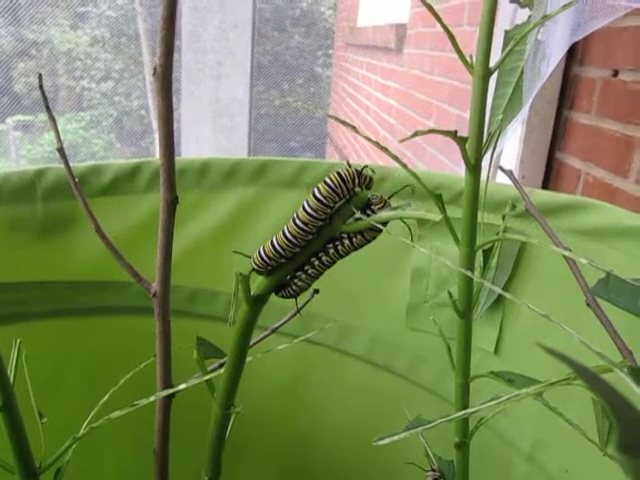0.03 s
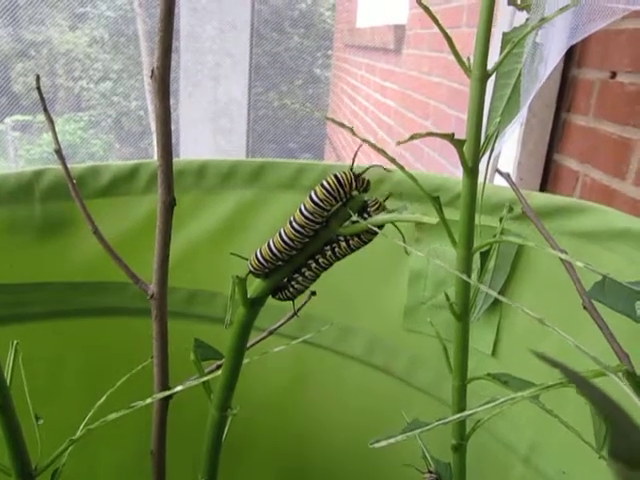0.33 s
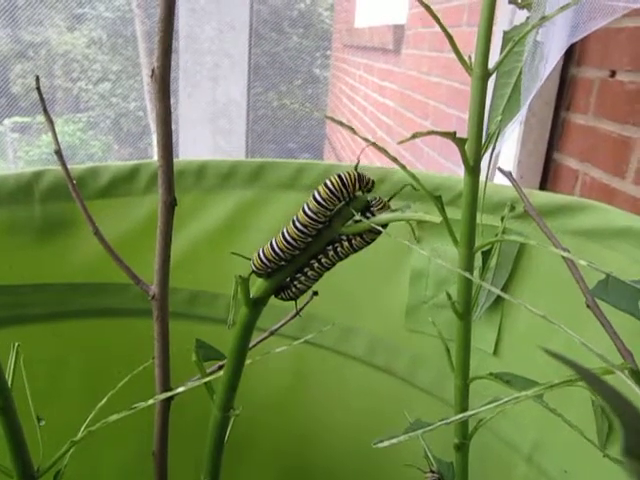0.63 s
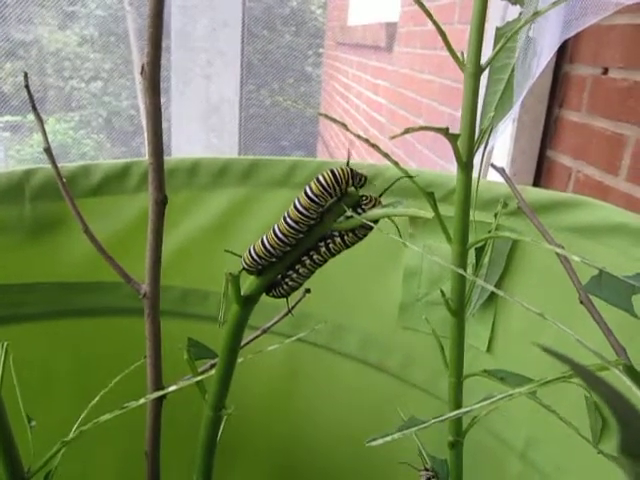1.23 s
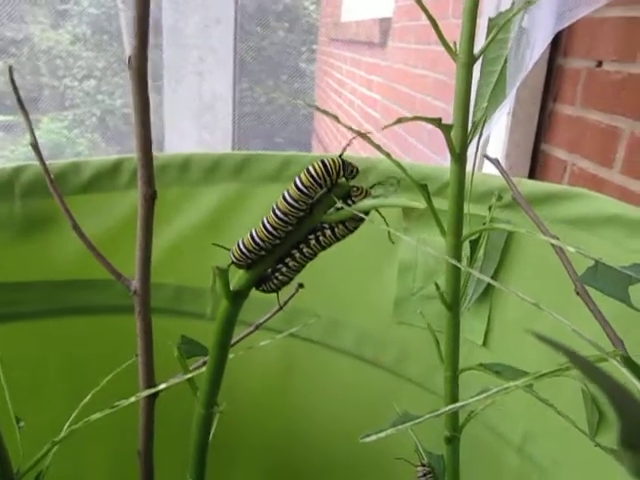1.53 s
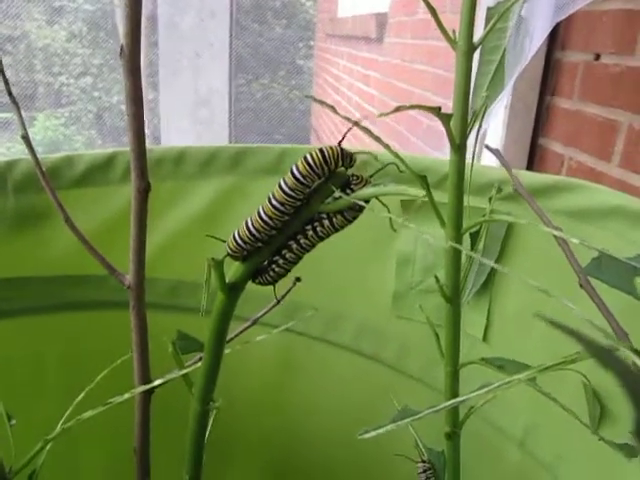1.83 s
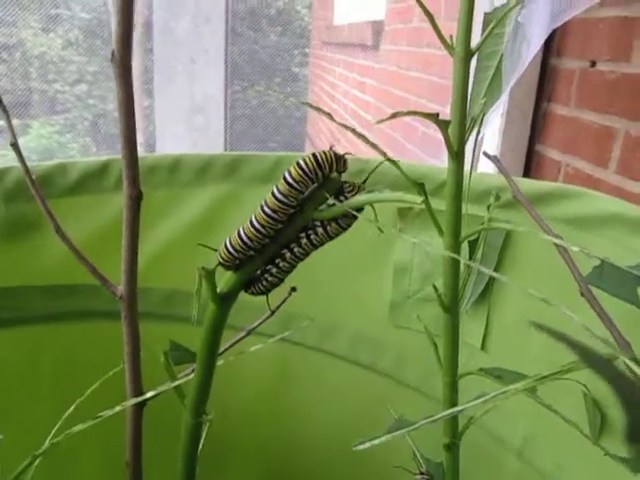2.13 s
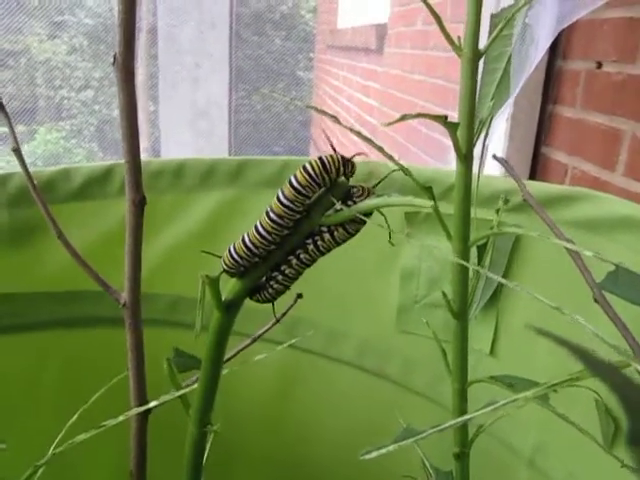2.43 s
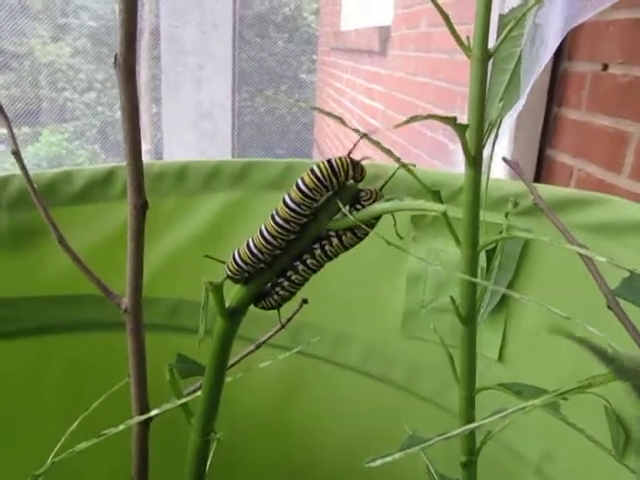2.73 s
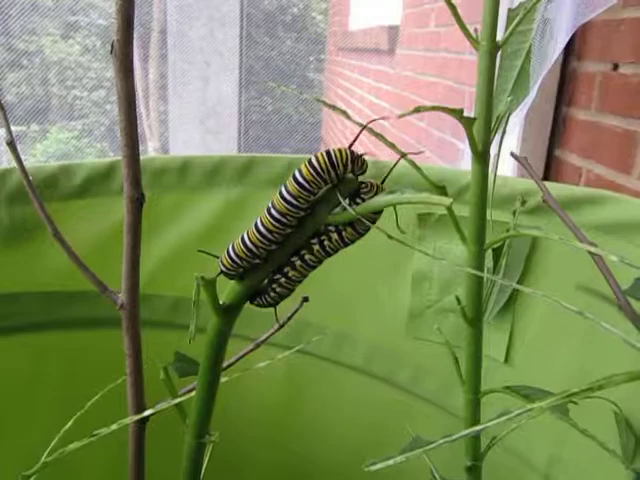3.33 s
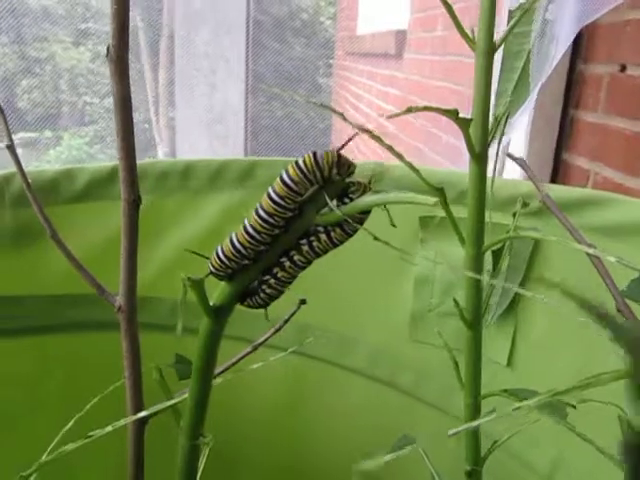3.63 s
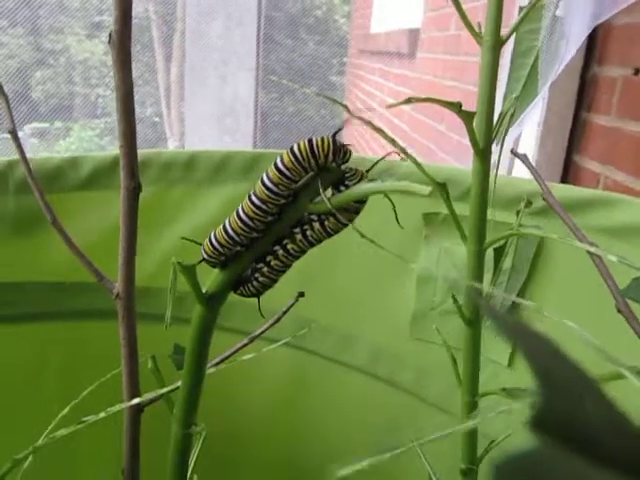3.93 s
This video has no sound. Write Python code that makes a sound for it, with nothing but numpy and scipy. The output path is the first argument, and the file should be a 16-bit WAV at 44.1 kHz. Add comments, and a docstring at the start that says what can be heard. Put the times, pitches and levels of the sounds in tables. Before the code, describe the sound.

Insects drone in a steady, high chorus in a garden, over a low rumble and airy hush. Distant birds chirp faintly now and then. Soft handling knocks and rustles come close to the microphone, with one sharp click late on.

```python
"""Far insect chorus in a summer garden: many calls merge into a pulsing noise band near 6 kHz.
A few nearer insects hold narrow pitches; a low rumble and an airy hush lie underneath.
One distant bird chips in pairs, another gives falling whistles; both echo among the trees.
Close by: one sharp ringing click, and noise bursts for soft knocks, scuffs and rustles of handling."""
import sys
import numpy as np
from scipy import signal
from scipy.fft import rfft, irfft, next_fast_len
from scipy.io import wavfile
from scipy.ndimage import uniform_filter1d, map_coordinates

SR = 44100
rng = np.random.default_rng(int(sys.argv[2]) if len(sys.argv) > 2 else 0)


def unload_audio(sound):
    """Save the sound as a 16-bit wav file, at the path given as the first command line argument."""
    columns = np.transpose(np.atleast_2d(sound))
    # keep every value between -1 and 1, then stretch to whole-number steps
    steps = np.round(np.clip(columns, -1, 1) * 32767)
    wavfile.write(sys.argv[1], SR, steps.astype(np.int16))


N = 176400

# Noise spectra. Each row: frequency in Hz, relative density in dB.
RUMBLE_SPECTRUM = [(10, -34), (20, -9), (35, -3), (57, 1), (72, -2.5), (88, 1), (100, -3), (114, -0.34),
                   (140, -6), (170, -13), (240, -16), (400, -34.5), (800, -70)]
AIR_SPECTRUM = [(100, -11), (250, 1.5), (400, -1), (600, -3), (1120, -4.5), (1700, -9), (2700, -11),
                (4000, -16), (5200, -16), (7100, -20), (8000, -24.5), (10500, -27.5), (13000, -32.5),
                (15800, -37)]
FIZZ_SPECTRUM = [(2000, -15), (5000, -8), (8000, 3), (11000, -1), (15800, -13)]
CHORUS_SPECTRUM = [(4900, -36), (5400, -12.5), (5700, -5.5), (5950, -4.5), (6130, -0.5), (6280, -1),
                   (6400, -5.5), (6520, -12), (6700, -35)]
# Stereo width of the noises. Each row: frequency in Hz, side minus mid in dB.
STEREO_WIDTH = [(60, -26.5), (120, -21), (190, -17.5), (270, -18), (380, -13.5), (640, -12), (860, -7.5),
                (1250, -8), (1650, -5), (2500, -1.5), (4300, -1), (6000, -0.5), (7200, 1), (10000, 0.5),
                (15000, 0)]
# Swell of rumble and air. Each row: time in seconds, gain in dB.
BACKGROUND_SWELL = [(0, -1.5), (.25, -2), (.5, 0.5), (1.15, -0.8), (1.5, 0), (2.2, -0.3), (2.9, -0.34),
                    (4, .5)]
# Knocks and scuffs. Each row: start in seconds, level in dB, centre in Hz, width in octaves,
# T60 in seconds.
KNOCK_BURSTS = [(.445, -38, 1900, .1, .06), (.443, -41, 3900, .2, .03), (.598, -46, 4400, .2, .05),
                (1.995, -42, 2100, .3, 0.15), (2.095, -28, 740, .45, .024), (2.154, -35.5, 780, .4, .04),
                (2.275, -43, 2500, .5, .12), (2.519, -31.5, 1290, .8, .04), (2.555, -40.5, 4000, .5, .05),
                (2.6, -41.5, 5200, .25, 0.076), (3.195, -35.5, 2250, .28, .13),
                (3.222, -35.5, 1700, 0.8, .1), (3.345, -35.5, 900, 0.98, .05),
                (3.37, -37.5, 515, 0.83, 0.17), (3.383, -30.5, 900, 0.77, 0.037),
                (3.384, -36, 2700, .35, 0.044), (3.68, -29.5, 2700, 0.41, 0.035)]
# Fabric rustles. Each row: start in seconds, level in dB, centre in Hz, width in octaves,
# fade time in seconds.
RUSTLE_BURSTS = [(.4, -58, 14000, .3, .04), (0.473, -51.5, 10000, .4, 0.053), (.69, -54, 9000, .3, .04),
                 (.88, -57, 11000, .4, 0.04), (1.41, -46.5, 8800, 0.32, 0.036),
                 (1.45, -50.5, 9000, 0.45, 0.043), (1.68, -51.5, 9500, .45, 0.036),
                 (1.948, -44, 6800, .4, 0.04), (3.039, -47.5, 8600, 0.24, 0.035),
                 (3.222, -51, 8400, 0.34, 0.036), (3.775, -52.5, 10500, .35, 0.047)]
# Ringing modes of the click. Each row: frequency in Hz, relative level in dB, T60 in seconds.
CLICK_RING_MODES = [(549, -16.5, 0.052), (1084, -5, 0.028), (1610, -2.5, 0.0085), (2250, -10, 0.01),
                    (3280, -6, 0.0041), (4530, -5.5, 0.0073), (5200, -5, 0.0061), (9600, -13, 0.0028),
                    (13000, -16, .002)]
# Bird chips. Each row: start in seconds, pitch in Hz, level before echo in dB, left minus right in dB.
BIRD_CHIPS = [(.875, 3830, -42, -3), (.951, 3770, -42.5, -1), (1.62, 3720, -48, 0),
              (1.735, 3744, -46.5, -1), (2.824, 3795, -37, -3), (2.961, 3780, -40, -7),
              (3.583, 3780, -46.5, -2), (3.69, 3740, -43.5, 0)]
# Bird whistles. Each row: start and length in seconds, first and last pitch in Hz,
# level before echo in dB.
BIRD_WHISTLES = [(-.08, .19, 3150, 2960, -57), (2.05, 0.22, 3196, 2985, -57.5),
                 (3.71, 0.041, 3030, 2780, -52.5), (3.792, .025, 4500, 4270, -54)]
# Nearer insects. Each row: pitch in Hz, level in dB, left minus right in dB.
NEAR_INSECTS = [(5700, -63, 1), (5940, -61, -1), (6100, -59.5, 0), (6400, -61, 3)]
# Chorus loudness. Each row: time in seconds, base level in dB.
CHORUS_ENVELOPE = [(0, -50), (.25, -53), (.45, -48), (1.2, -49.5), (2, -49), (3, -50), (4, -49)]

RUMBLE_DB, RUMBLE_PAN_DB, AIR_DB, AIR_PAN_DB = -33.5, .83, -41.5, .4
FIZZ_DB, FIZZ_RATE_HZ, FIZZ_SWING_DB, FIZZ_GRAIN_DB = -66.5, 30, 3.5, 2.5
TICKS_PER_S, TICK_DB, TICK_SCATTER_DB = 14, -53.5, 2.5
TICK_HZ, TICK_OCTAVES, TICK_T60_S = 6500, .75, .055
HAND_PAN_DB, KNOCK_ATTACK_S, RUSTLE_ATTACK_S, RUSTLE_GRAIN_DB = 6, .001, .0063, 1.5
CLICK_START_S, CLICK_GAIN_DB, CLICK_PAN_DB, CLICK_RIGHT_LAG_S = 3.1138, -16.5, 10, .000292
CHIP_S, CHIP_FALL_HZ, CHIP_ECHO_DB, CHIP_JITTER_RAD = .015, 110, 1.5, .35
SLUR_S, SLUR_FALL_HZ, SLUR_GAIN_DB = .0298, 550, -11.5
TREES_T60_S, WHISTLE_ECHO_DB, WHISTLE_JITTER_RAD = .63, 8, .64
INSECT_HALF_WIDTH_HZ = 14
PULSE_HZ, PULSE_DEPTH, SURGE_HZ, SURGE_DB, CHORUS_PAN_DB = 84.8, .17, 3.2, .6, -1.6
TOP_HZ = 15800


def amp(db):
    """Decibels to gain."""
    return 10 ** (np.asarray(db) / 20)


def unit_rms(x):
    """Scale to rms 1."""
    return x / np.sqrt(np.mean(x ** 2) + 1e-20)


def pan(db):
    """Stereo gains for a left minus right level."""
    return amp(np.array([[db], [-db]]) / 2)


def gain_at(rows, hz):
    """Gain from (Hz, dB) rows, on a log frequency axis."""
    row_hz, row_db = np.transpose(rows)
    return amp(np.interp(np.log(hz + 1), np.log(row_hz + 1), row_db))


def curve(rows):
    """(s, value) rows interpolated per sample."""
    return np.interp(np.arange(N) / SR, *np.transpose(rows))


def wobble(rate_hz):
    """Smooth random curve, rate_hz knots a second."""
    knots = rng.standard_normal(int(N * rate_hz / SR) + 4)
    return map_coordinates(knots, [np.arange(N) * rate_hz / SR])


def filtered(x, response):
    """Apply a frequency response by FFT."""
    n = x.shape[-1]
    n_fft = next_fast_len(n + 8192)
    return irfft(rfft(x, n_fft) * response(np.fft.rfftfreq(n_fft, 1 / SR)), n_fft)[..., :n]


def add(out, start_s, x):
    """Mix in a stereo sound, cut at the edges."""
    i = round(start_s * SR)
    x = x[:, max(-i, 0):N - i]
    out[:, max(i, 0):max(i, 0) + x.shape[1]] += x


def diffuse(pair, response):
    """Colour two noises and blend them as mid and side, rms 1."""
    def mid_side_gains(hz):
        angle = np.arctan(gain_at(STEREO_WIDTH, hz))
        return response(hz) * np.array([np.cos(angle), np.sin(angle)])
    mid, side = filtered(pair, mid_side_gains)
    return unit_rms(np.array([mid + side, mid - side]))


def noise_bed(spectrum, patchy_db):
    """Stereo noise with random gain patches in time and frequency."""
    bins = signal.stft(rng.standard_normal((2, N)), nperseg=512)[2]
    patches = uniform_filter1d(rng.standard_normal(bins.shape[1:]), size=5, axis=0)
    patches = uniform_filter1d(patches, size=12, axis=1)
    pair = signal.istft(bins * amp(patchy_db * unit_rms(patches)), nperseg=512)[1][:, :N]
    return diffuse(pair, lambda hz: gain_at(spectrum, hz))


def noise_band(centre_hz, octaves):
    """Time axis and 0.25 s of stereo noise in one resonance."""
    def resonance(hz):
        detune = np.log2((hz + 1) / centre_hz) / octaves
        return 1 / (1 + detune ** 2 / 2) ** 2
    t = np.arange(SR // 4) / SR
    return t, diffuse(rng.standard_normal((2, len(t))), resonance)


def background():
    """Low rumble, as of far traffic, under an airy hush."""
    swell_db = curve(BACKGROUND_SWELL)
    rumble = amp(RUMBLE_DB + swell_db + .46 * wobble(5.03)) * noise_bed(RUMBLE_SPECTRUM, patchy_db=.3)
    air = amp(AIR_DB + swell_db + .3 * wobble(14)) * noise_bed(AIR_SPECTRUM, patchy_db=1.38)
    return pan(RUMBLE_PAN_DB) * rumble + pan(AIR_PAN_DB) * air


def fizz():
    """Faint, grainy treble rustling that flickers."""
    level_db = FIZZ_DB + FIZZ_SWING_DB * wobble(FIZZ_RATE_HZ) + FIZZ_GRAIN_DB * wobble(900)
    return amp(level_db) * noise_bed(FIZZ_SPECTRUM, patchy_db=1.5)


def ticks():
    """Tiny dry ticks, random in time, strength and colour."""
    out = np.zeros((2, N))
    count = int(TICKS_PER_S * N / SR)
    starts_s = rng.uniform(0, N / SR, count)
    for start_s, (strength, colour) in zip(starts_s, rng.standard_normal((count, 2))):
        t, noise = noise_band(TICK_HZ * 2 ** (colour / 2), TICK_OCTAVES)
        add(out, start_s, amp(TICK_DB + TICK_SCATTER_DB * strength - 60 * t / TICK_T60_S) * noise)
    return out


def handling():
    """Dull, damped knocks and grainy brushes of fabric."""
    out = np.zeros((2, N))
    for start_s, db, hz, octaves, t60_s in KNOCK_BURSTS:
        t, noise = noise_band(hz, octaves)
        attack = 1 - np.exp(-t / KNOCK_ATTACK_S)
        add(out, start_s, attack * amp(db - 60 * t / t60_s) * noise)
    for start_s, db, hz, octaves, fade_s in RUSTLE_BURSTS:
        t, noise = noise_band(hz, octaves)
        grain_db = RUSTLE_GRAIN_DB * wobble(494)[:len(t)]
        attack = 1 - np.exp(-t / RUSTLE_ATTACK_S)
        fade = np.exp(-(t / fade_s) ** 2)
        add(out, start_s, amp(db + grain_db) * attack * fade * noise)
    return pan(HAND_PAN_DB) * out


def click():
    """Hard, dry click close on the left; adjacent modes ring in opposite phase."""
    t = np.arange(SR // 10) / SR
    age_s = np.maximum(t - np.array([[0], [CLICK_RIGHT_LAG_S]]), 0)
    ring = sum((-1) ** k * amp(db - 60 * age_s / t60_s) * np.sin(2 * np.pi * hz * age_s)
               for k, (hz, db, t60_s) in enumerate(CLICK_RING_MODES))
    out = np.zeros((2, N))
    add(out, CLICK_START_S, amp(CLICK_GAIN_DB) * pan(CLICK_PAN_DB) * ring)
    return out


def tree_echo(call, echo_db):
    """Direct call plus a decaying tail scattered by trees."""
    t = np.arange(SR // 2) / SR
    tail = rng.standard_normal((2, len(t))) * amp(-60 * t / TREES_T60_S)
    impulse = amp(echo_db) * tail / np.linalg.norm(tail[0])
    impulse[:, 0] += 1  # direct path
    return signal.fftconvolve(call[None], impulse, axes=1)


def bird_note(length_s, first_hz, last_hz, jitter_rad=0):
    """Gliding tone that swells and fades; phase jitter roughens it."""
    progress = np.linspace(0, 1, int(length_s * SR))
    pitch_hz = first_hz + (last_hz - first_hz) * progress
    phase = 2 * np.pi * np.cumsum(pitch_hz) / SR + jitter_rad * wobble(302)[:len(progress)]
    return np.sqrt(np.abs(np.sin(np.pi * progress))) * np.sin(phase)


def birds():
    """Short chips ending in a weak downward slur, and thin falling whistles."""
    out = np.zeros((2, N))
    for start_s, hz, db, pan_db in BIRD_CHIPS:
        end_hz = hz - CHIP_FALL_HZ / 2
        chip = bird_note(CHIP_S, end_hz + CHIP_FALL_HZ, end_hz, CHIP_JITTER_RAD)
        slur = amp(SLUR_GAIN_DB) * bird_note(SLUR_S, end_hz, end_hz - SLUR_FALL_HZ)
        call = np.concatenate([chip, slur])
        add(out, start_s, amp(db) * pan(pan_db) * tree_echo(call, CHIP_ECHO_DB))
    for start_s, length_s, first_hz, last_hz, db in BIRD_WHISTLES:
        whistle = bird_note(length_s, first_hz, last_hz, WHISTLE_JITTER_RAD)
        add(out, start_s, amp(db) * tree_echo(whistle, WHISTLE_ECHO_DB))
    return out


def near_insects():
    """Single insects, each holding one narrow, fuzzy pitch."""
    out = np.zeros((2, N))
    for pitch_hz, db, pan_db in NEAR_INSECTS:
        noise = rng.standard_normal((2, N))
        song = diffuse(noise, lambda hz: 1 / (1 + ((hz - pitch_hz) / INSECT_HALF_WIDTH_HZ) ** 2))
        out += amp(db) * pan(pan_db) * song
    return out


def insect_chorus():
    """Many far insects merged into one shrill band, with fast pulsing and a slow surge."""
    t = np.arange(N) / SR
    rate_hz = PULSE_HZ * (1 + .025 * wobble(8))
    pulses = 1 + PULSE_DEPTH * np.sin(2 * np.pi * np.cumsum(rate_hz) / SR)
    surge_db = SURGE_DB * np.sin(2 * np.pi * SURGE_HZ * t + wobble(1))
    level_db = curve(CHORUS_ENVELOPE) + surge_db + .5 * wobble(30)
    return pan(CHORUS_PAN_DB) * amp(level_db) * pulses * noise_bed(CHORUS_SPECTRUM, patchy_db=.6)


def scene():
    """The garden plus the small noises close by."""
    garden = background() + insect_chorus() + near_insects() + birds()
    return garden + click() + handling() + fizz() + ticks()


def record(dry):
    """Brick-wall low-pass at TOP_HZ."""
    return filtered(dry, lambda hz: hz < TOP_HZ)


dry = scene()
out = record(dry)
unload_audio(out)
```